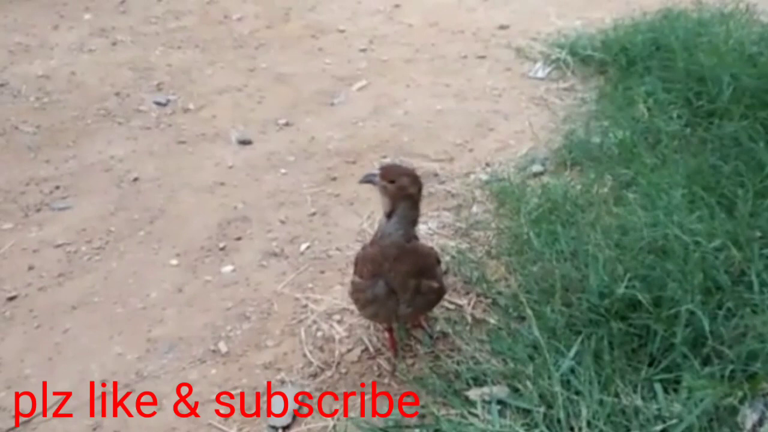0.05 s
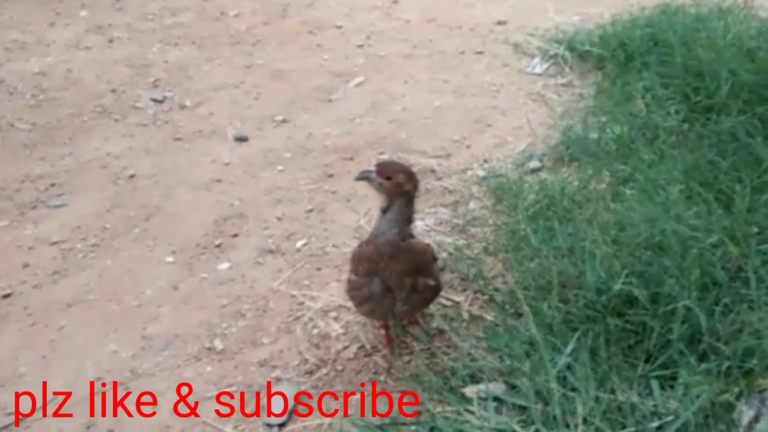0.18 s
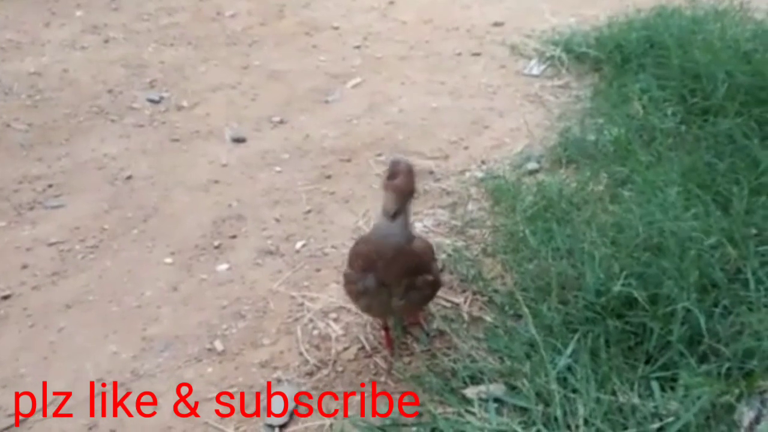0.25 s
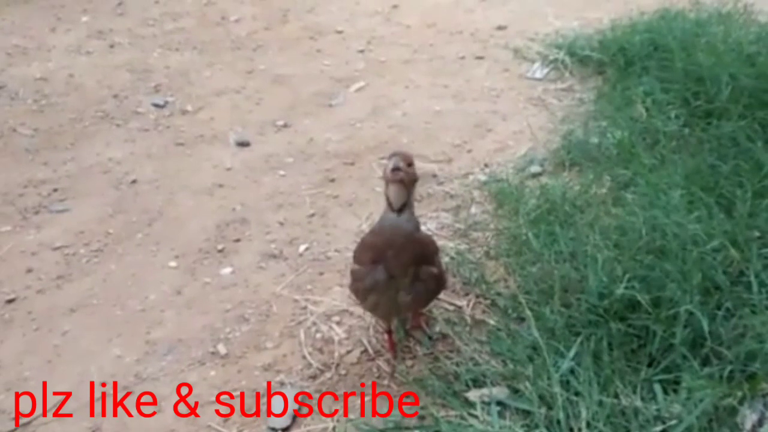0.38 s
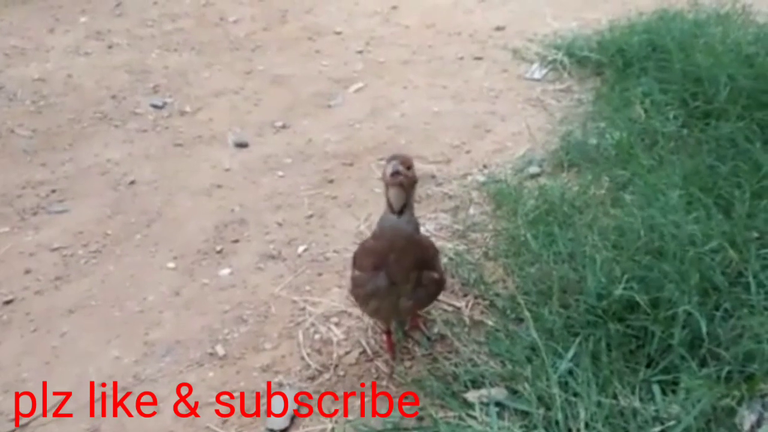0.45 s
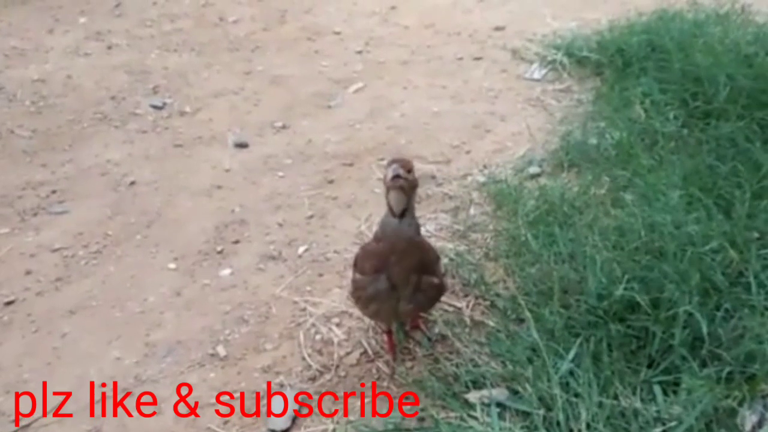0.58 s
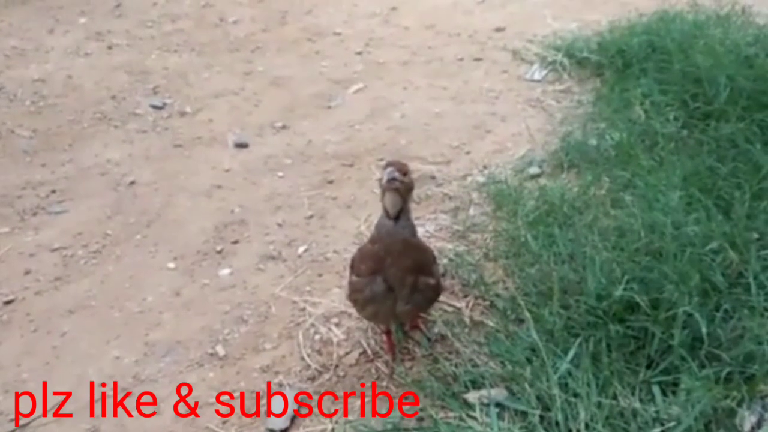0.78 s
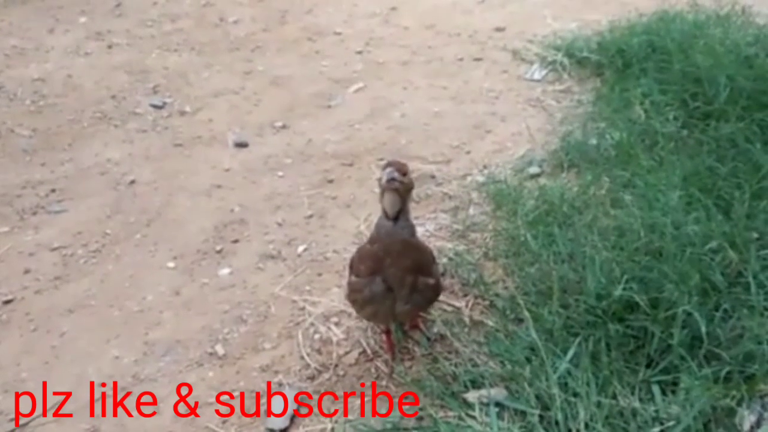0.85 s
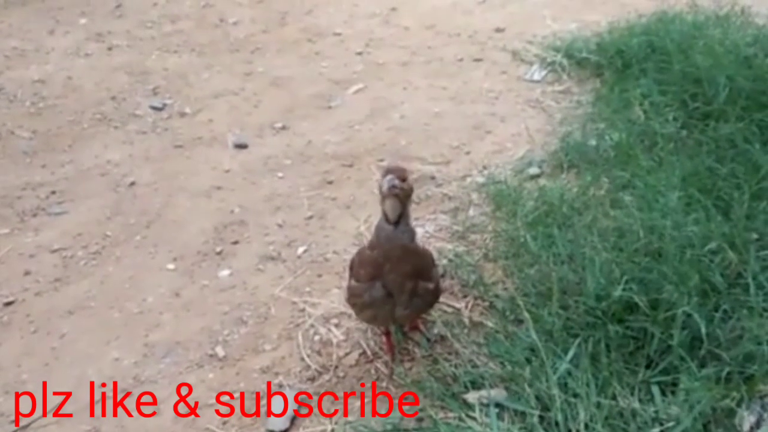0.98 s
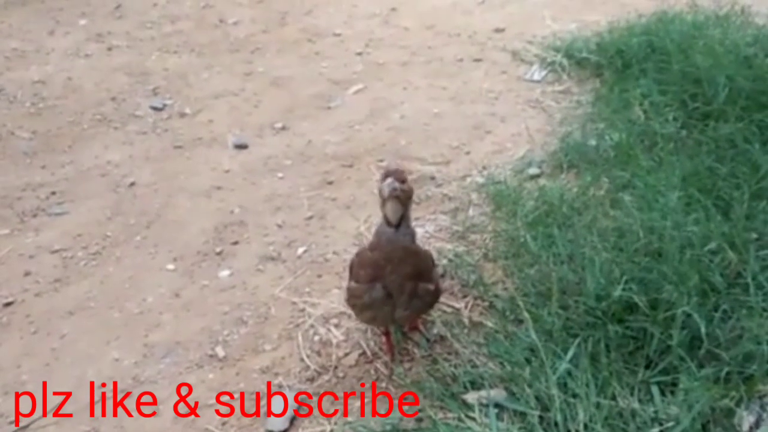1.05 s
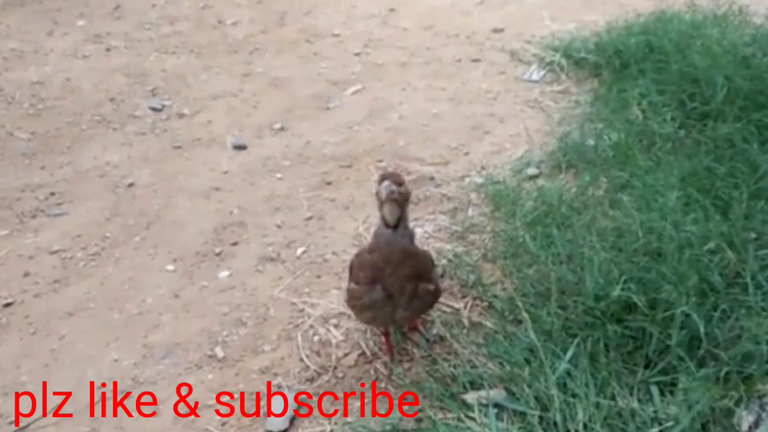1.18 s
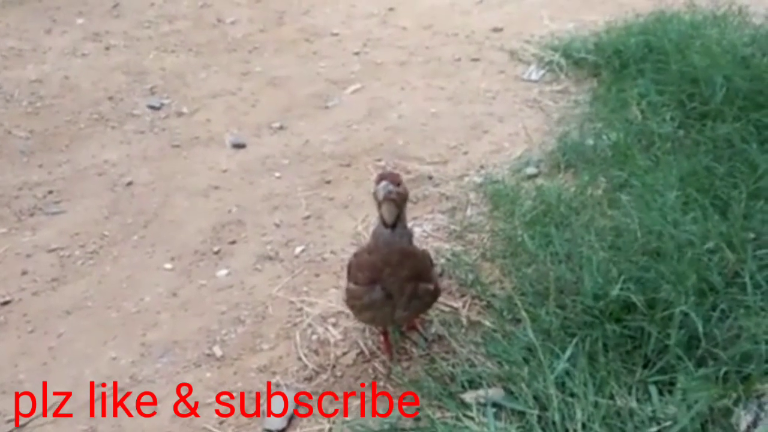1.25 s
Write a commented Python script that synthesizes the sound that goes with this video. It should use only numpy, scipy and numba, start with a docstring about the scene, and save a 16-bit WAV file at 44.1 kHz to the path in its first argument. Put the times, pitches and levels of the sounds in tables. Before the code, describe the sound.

A partridge calls once: thin rising whistle, cracked loud note, falling rattle, then six fading clucks.

```python
"""On a dirt track between echoing walls, a partridge calls a few metres from a phone: a thin rising whistle,
a cracked break, a loud held note, a falling note that splits into a rattle, then six hoarse, fading clucks.
The sung notes are stacks of sine partials with noise for breath; the clucks are uneven pulses ringing
throat and beak. Wind rumbles on the microphone over a faint steady floor, both shaped noise,
and the echo of an earlier call, fading bands of noise, dies away at the start."""
import sys
import numpy as np
from scipy import signal
from scipy.fft import rfft, irfft
from scipy.io import wavfile
from numba import njit

SR = 44100
rng = np.random.default_rng(int(sys.argv[2]) if len(sys.argv) > 2 else 0)


def generate_wav(sig):
    """Save sig (samples, or channels by samples) to the path in sys.argv[1] as 16-bit PCM at SR."""
    pcm = np.round(np.clip(np.atleast_2d(sig).T, -1, 1) * 32767).astype(np.int16)
    wavfile.write(sys.argv[1], SR, pcm)


N = 57330  # samples, 1.3 s

# Echo of an earlier call, by band: (centre [Hz], width [Hz], level [dB])
EARLIER_BANDS = [(1095, 170, -6), (1300, 67, -8), (800, 67, -22)]
# A slow and a fast decay, added: start level [dB] and time to fall 60 dB [s]
EARLIER_DB, EARLIER_T60_S, EARLIER_END_DB, EARLIER_END_T60_S = -51.5, 0.59, -23, 0.022
# Wind gusts: (time [s], level [dB])
WIND_LEVEL = [(0.0, -69), (0.024, -65.5), (0.288, -71), (0.368, -97), (0.438, -37), (0.542, -62.5),
              (0.572, -47.5), (0.68, -58.5), (0.702, -50.5), (0.792, -72), (0.868, -35.5), (0.944, -46.5),
              (0.984, -45.5), (1.024, -49), (1.064, -43), (1.096, -49), (1.244, -39), (1.3, -50.5)]
# Wind rumble, relative mix of bands: (centre [Hz], width [Hz], level [dB])
WIND_BANDS = [(58, 40, 7), (108, 76, -2.5), (170, 200, -18), (296, 600, -15)]
# Relative spectrum of the steady floor: (frequency [Hz], density [dB per Hz])
FLOOR_SPECTRUM = [(88, -44.5), (150, 1), (310, -0.5), (355, -7.5), (482, 0), (855, -4), (1350, -3),
                  (1610, -9), (14500, -56)]
FLOOR_DB = -65  # rms

# Rising whistle: (time [s], pitch [Hz], level [dB])
WHISTLE_LINE = [(0.2, 2255, -76), (0.214, 2389, -32.5), (0.226, 2437, -21.5), (0.256, 2528, -21.5),
                (0.334, 2622, -21), (0.392, 2778, -23.5), (0.402, 2780, -25)]
WHISTLE_OCTAVE_DB = -43  # second partial, relative to the first
# Air hissing past the whistle: (centre [Hz], width [Hz], level [dB])
WHISTLE_AIR_BANDS = [(1550, 150, -50.5), (2034, 203, -47)]
AIR_ON_S, AIR_OFF_S, AIR_RISE_S = .193, .40, 0.0041
# Higher hiss, levels at full growth: (centre [Hz], width [Hz], level [dB])
WHISTLE_HISS_BANDS = [(4260, 900, -64.5), (6100, 2200, -59), (9690, 2100, -44.5), (12000, 2000, -60)]
HISS_START_DB, HISS_ON_S = -15.5, 0.21

# Short notes: two faint ticks as the whistle starts, then the notes where the voice cracks;
# pitch glides to a turning point and eases back a little:
# (start [s], length [s], start pitch [Hz], turning pitch [Hz], 1st partial [dB], 2nd [dB],
# hump of the upper partials [dB])
SHORT_NOTES = [(0.194, 0.0077, 1493, 1593, -48, -81, -78.5), (.194, 0.018, 899, 893, -54.5, -87.5, -94),
               (0.392, 0.014, 1035, 1172, -22, -16, -39.5),
               (0.402, 0.0095, 1700, 1710, -11.5, -31.5, -26.5),
               (0.412, 0.0067, 1305, 1249, -21, -24, -34.5), (0.415, 0.021, 895, 896.4, -27.5, -25, -45),
               (0.468, 0.021, 995, 895, -36, -27.5, -60.5)]
SHORT_ROUGHNESS = .2  # depth of the level wobble
UPPER_TILT_DB_PER_KHZ, UPPER_PEAK_HZ = -3, 5000

# Echoes off the walls: (delay [s], level [dB])
WALL_SLAPS = [(0.054, -25), (0.062, -48), (.099, -22), (0.11, -38.5), (.128, -23), (.16, -33.5)]
ECHO_HZ, ECHO_WIDTH_HZ = 1600, 4300
TAIL_DB, TAIL_T60_S, TAIL_START_S = -18.5, 0.64, 0.045

# Breath under the loud notes: (time [s], level [dB])
BREATH_LEVEL = [(.386, -62), (.396, -38), (.41, -23.5), (.43, -33), (.439, -23.5), (.444, -42.5),
                (.468, -46.5), (.474, -32.5), (.487, -34), (.494, -30.5), (.501, -40), (.515, -26.5),
                (.528, -33.5), (.54, -48), (.55, -75.5)]
# Relative mix of breath bands: (centre [Hz], width [Hz], level [dB])
BREATH_BANDS = [(1473, 870, -3), (5020, 3000, -2), (9300, 1900, -13.5), (13500, 2500, -29)]

# Loud held note: (time [s], pitch [Hz], level of the fundamental [dB])
HELD_LINE = [(.433, 1825, -51), (.440, 1868, -5), (.447, 1811, -8.5), (.468, 1783, -7.5),
             (.473, 1837, -14.5), (.477, 1835, -41.5)]
# 2nd to 7th partials of the held note, relative to its fundamental: (level [dB])
HELD_UPPER_DB = [-26, -32.5, -32, -42, -36.5, -54.5]

# Falling note, heard mainly as the third multiple of a slower flutter until it splits:
# (time [s], flutter [Hz], 2nd multiple [dB], 3rd [dB], 4th [dB], 6th [dB], 9th [dB],
# hump of the other multiples [dB])
FALL_LINE = [(.489, 611.4, -58, -44.5, -59.5, -40, -29.5, -62),
             (.494, 604.7, -59.5, -5, -60, -36.5, -38, -50.5),
             (.501, 578.6, -53, -11.5, -64.5, -44, -42, -71), (.510, 536.3, -37.5, -12, -41, -37, -40, -44),
             (.524, 509.1, -23, -11, -21.5, -61, -40.5, -42.5),
             (.531, 464.2, -41.5, -21, -21, -44.5, -49.5, -48),
             (.538, 445, -42, -12, -17, -40.5, -54.5, -46.5),
             (.547, 422, -65, -32.5, -28, -64, -57.5, -75.5)]
FALL_FADE_S = .012

# Clucks: (centre [s], length [s], level [dB], top pulse rate before jitter [Hz], mid-cluck throat [Hz],
# relative beak resonance [dB], relative treble [dB], relative top hiss [dB])
CLUCK_NOTES = [(0.667, 0.062, -13, 352, 1321, -1.5, -19, -39),
               (0.776, 0.064, -13.5, 450, 1240, -5, -22, -41.5),
               (.888, 0.056, -14.5, 435.6, 1181, -6, -24.5, -41.5),
               (.995, 0.054, -17.5, 356, 1113, -15.5, -31.5, -44),
               (1.102, 0.057, -22.5, 263.1, 1066, -22.5, -32.5, -49),
               (1.213, .072, -29.5, 407, 1083, -27.5, -47, -104.5)]
# Treble resonances of a cluck, relative mix: (centre [Hz], width [Hz], level [dB])
CLUCK_TREBLE_BANDS = [(2600, 190, -12.5), (4370, 1900, -5), (6680, 670, -28)]
RATE_SAG, THROAT_SAG = .28, .12  # fractions, per squared and per plain half length
CLUCK_POINTEDNESS, TREBLE_POINTEDNESS = 1.4, 3.0  # powers of the swell
BEAK_PEAK_AT, BEAK_SPREAD = -.15, .42  # in half lengths of a cluck from its centre
JITTER, SHIMMER_DB, CLUCK_BREATH_DB = .035, 3.0, -8  # cycle length spread, pulse size spread, breath
THROAT_WIDTH_HZ, BEAK_HZ, BEAK_WIDTH_HZ = 430, 1703, 420
BODY_LOW_HZ, BODY_HIGH_HZ = 888, 1964
TOP_HISS_HZ, TOP_HISS_WIDTH_HZ = 10500, 6000

SIDE_DB, SIDE_LOW_HZ = -11, 5500
CEILING, TOP_HZ = 0.53, 14400  # peak level approached (full scale = 1), upper cutoff


def undb(db):
    """Decibels to amplitude."""
    return 10 ** (np.asarray(db) / 20)


def unit(x):
    """Scale to an rms of one."""
    return x / np.sqrt(np.mean(x ** 2))


def columns(table):
    """Time slice that a table covers, and its columns joined by straight lines over it."""
    table = np.array(table, float)
    span = slice(int(table[0, 0] * SR), min(int(table[-1, 0] * SR), N))
    t = np.arange(N)[span] / SR
    return [span] + [np.interp(t, table[:, 0], column) for column in table.T[1:]]


@njit
def svf(x, hz, width):
    """State-variable band-pass with a moving centre, gain 1 at the centre."""
    y, band_state, low_state = np.empty(len(x)), 0., 0.
    for i in range(len(x)):
        g, k = np.tan(np.pi * hz[i] / SR), width / hz[i]
        v = (band_state + g * (x[i] - low_state)) / (1 + g * (g + k))
        band_state, low_state, y[i] = 2 * v - band_state, low_state + 2 * g * v, k * v
    return y


def band(x, hz, width):
    """A resonance applied twice."""
    hz = np.clip(hz, 20, .45 * SR) + np.zeros(len(x))
    return svf(svf(x, hz, 1. * width), hz, 1. * width)


def hiss(bands):
    """Unrelated noise bands, each at its own rms level."""
    return sum(undb(db) * unit(band(rng.standard_normal(N), hz, width)) for hz, width, db in bands)


def highpass(x, order, hz):
    """Butterworth high-pass."""
    return signal.sosfilt(signal.butter(order, hz, "highpass", fs=SR, output="sos"), x)


def stack(hz, named, upper_db, count):
    """Sine partials of a pitch: some with their own rms level, the rest under one broad hump."""
    phase, out = 2 * np.pi * np.cumsum(hz) / SR, 0
    for k in range(1, count + 1):
        hump_db = upper_db + UPPER_TILT_DB_PER_KHZ * np.abs(k * hz - UPPER_PEAK_HZ) / 1000
        db = named.get(k, hump_db)
        out = out + np.sqrt(2) * undb(db) * np.sin(k * phase + k * k)
    return out


def earlier_call():
    """Narrow noise bands under two added exponential decays: the last echo of an earlier call."""
    t = np.arange(N) / SR
    slow = undb(EARLIER_DB - 60 * t / EARLIER_T60_S)
    fast = undb(EARLIER_END_DB - 60 * t / EARLIER_END_T60_S)
    return (slow + fast) * hiss(EARLIER_BANDS)


def wind():
    """Low noise bands swelling and dropping as wind rumbles on the microphone."""
    level = undb(np.interp(np.arange(N) / SR, *np.array(WIND_LEVEL).T))
    return level * unit(hiss(WIND_BANDS))


def steady_floor():
    """Faint noise shaped by a fixed spectrum, joined along log frequency."""
    hz = np.arange(N // 2 + 1) * SR / N + 1
    corner_hz, corner_db = np.array(FLOOR_SPECTRUM).T
    shape = undb(np.interp(np.log(hz), np.log(corner_hz), corner_db))
    return undb(FLOOR_DB) * unit(irfft(rfft(rng.standard_normal(N)) * shape, N))


def whistle():
    """A near sine that creeps upward, with air hissing beside it and a higher hiss growing through it."""
    t, tone = np.arange(N) / SR, np.zeros(N)
    span, hz, db = columns(WHISTLE_LINE)
    release = np.clip((t[span][-1] - t[span]) / 0.002, 0, 1)  # 2 ms
    tone[span] = release * stack(hz, {1: db, 2: db + WHISTLE_OCTAVE_DB}, 0, count=2)

    def gate(on):
        """Short linear rise at the onset and fall at the common end."""
        return np.clip((t - on) / AIR_RISE_S, 0, 1) * np.clip((AIR_OFF_S - t) / AIR_RISE_S, 0, 1)

    time_left = np.clip((AIR_OFF_S - t) / (AIR_OFF_S - HISS_ON_S), 0, 1)
    grow = undb(HISS_START_DB * time_left ** 2)
    air = gate(AIR_ON_S) * hiss(WHISTLE_AIR_BANDS)
    return tone + air + gate(HISS_ON_S) * grow * hiss(WHISTLE_HISS_BANDS)


def short_notes():
    """Onset ticks and cracked notes: brief rounded bursts of partials, gliding in pitch and rough in level."""
    out = np.zeros(N)
    for start, length, from_hz, turn_hz, first_db, second_db, upper_db in SHORT_NOTES:
        span, u = columns([(start, 0), (start + length, 1)])
        wobble = 1 + SHORT_ROUGHNESS * unit(band(rng.standard_normal(4096), 400, 600))[:len(u)]
        hz = from_hz + (turn_hz - from_hz) * np.sin(np.pi * u / 1.5)
        tone = stack(hz, {1: first_db, 2: second_db}, upper_db, count=7)
        out[span] += np.sin(np.pi * u) * wobble * tone
    return out


def walls(x):
    """Reflections: a few separate slaps and a thin diffuse tail, both dulled by one broad band-pass."""
    t = np.arange(N) / SR
    decay = undb(TAIL_DB - 60 * t / TAIL_T60_S) * (t > TAIL_START_S)
    # the divisor offsets the extra energy of a longer decay
    response = decay * rng.standard_normal(N) / np.sqrt(TAIL_T60_S * SR / 14)
    for delay, db in WALL_SLAPS:
        response[int(delay * SR)] += undb(db)
    return svf(signal.fftconvolve(x, response)[:N], ECHO_HZ + np.zeros(N), 1. * ECHO_WIDTH_HZ)


def breath():
    """Broad noise bands under the loud notes, following one level line."""
    out = np.zeros(N)
    span, db = columns(BREATH_LEVEL)
    out[span] = undb(db) * hiss(BREATH_BANDS)[span]
    return out


def held_note():
    """A strong fundamental with six weaker harmonics that share its level line."""
    out = np.zeros(N)
    span, hz, db = columns(HELD_LINE)
    partials = dict(enumerate([0] + HELD_UPPER_DB, 1))
    out[span] = undb(db) * stack(hz, partials, 0, count=7)
    return out


def falling_note():
    """Multiples of a falling flutter: the third leads, then its neighbours come up and split it to a rattle."""
    out = np.zeros(N)
    span, flutter_hz, *dbs, others_db = columns(FALL_LINE)
    fade = np.clip(np.arange(len(flutter_hz))[::-1] / (FALL_FADE_S * SR), 0, 1)
    multiples = {1: -90, **dict(zip((2, 3, 4, 6, 9), dbs))}
    out[span] = fade * stack(flutter_hz, multiples, others_db, count=20)
    return out


@njit
def pulse_train(hz, stretch, size):
    """A pulse at each wrap of the phase; every cycle has its own length and size."""
    pulses, phase, p, k = np.zeros(len(hz) + 1), np.empty(len(hz)), 0., 0
    for i in range(len(hz)):
        step = hz[i] * stretch[k] / SR
        p += step
        if p >= 1:
            p, k = p - 1, k + 1
            # share the pulse between two samples to place it between them
            pulses[i] += size[k] * p / step
            pulses[i + 1] += size[k] * (1 - p / step)
        phase[i] = p
    return pulses[:-1], phase


def clucks():
    """Uneven pulses whose rate arches up and down ring throat and beak; puffs of breath follow each pulse."""
    out = np.zeros(N)
    body_edges = signal.butter(3, [BODY_LOW_HZ, BODY_HIGH_HZ], "bandpass", fs=SR, output="sos")
    for centre, length, db, rate_hz, throat_hz, beak_db, treble_db, top_db in CLUCK_NOTES:
        span, u = columns([(centre - length / 2, -1), (centre + length / 2, 1)])
        chance = rng.standard_normal((2, 128))
        puff_noise, air = rng.standard_normal((2, 8192))[:, :len(u)].copy()

        rate = rate_hz * (1 - RATE_SAG * (u - BEAK_PEAK_AT) ** 2)
        pulses, phase = pulse_train(rate, 1 + JITTER * chance[0], undb(SHIMMER_DB * chance[1]))
        puffs = unit(np.exp(-phase / 0.13) * puff_noise)
        voice = unit(pulses) + undb(CLUCK_BREATH_DB) * puffs

        throat = unit(band(voice, throat_hz * (1 - THROAT_SAG * u), THROAT_WIDTH_HZ))
        beak_swell = np.exp(-((u - BEAK_PEAK_AT) / BEAK_SPREAD) ** 2)
        beak = undb(beak_db) * beak_swell * unit(band(voice, BEAK_HZ, BEAK_WIDTH_HZ))
        body = signal.sosfilt(body_edges, throat + beak)

        source = air + 0.15 * voice
        treble = undb(top_db) * unit(band(air, TOP_HISS_HZ, TOP_HISS_WIDTH_HZ))
        for hz, width, band_db in CLUCK_TREBLE_BANDS:
            treble = treble + undb(band_db + treble_db) * unit(band(source, hz, width))

        swell = np.cos(np.pi * u / 2).clip(0)
        out[span] += undb(db) * (swell ** CLUCK_POINTEDNESS * body + swell ** TREBLE_POINTEDNESS * treble)
    return out


def scene():
    """The bird, its echoes and the background, in stereo that differs only in the treble."""
    call = whistle() + short_notes() + breath() + held_note() + falling_note() + clucks()
    bird = highpass(call, 3, 650)  # a small body gives no bass
    echoes = walls(bird)
    background = wind() + steady_floor() + earlier_call()
    mid = bird + echoes + background
    side = undb(SIDE_DB) * highpass(np.roll(mid, 90), 6, SIDE_LOW_HZ)  # 90 samples late, about 2 ms
    return np.array([mid + side, mid - side])


def record(dry):
    """The phone rounds the loudest peaks and cuts the top."""
    rounded = dry / (1 + (dry / CEILING) ** 4) ** .25
    return signal.sosfilt(signal.ellip(10, .2, 70, TOP_HZ, fs=SR, output="sos"), rounded)


dry = scene()
out = record(dry)
generate_wav(out)
```